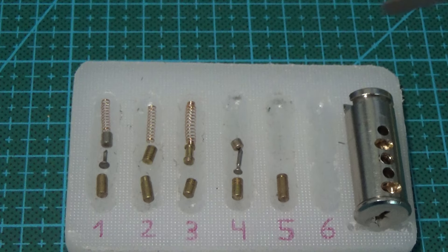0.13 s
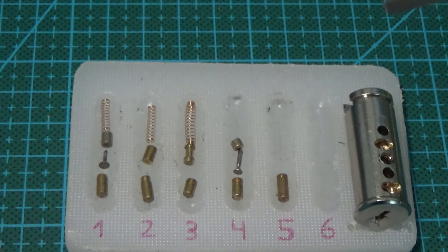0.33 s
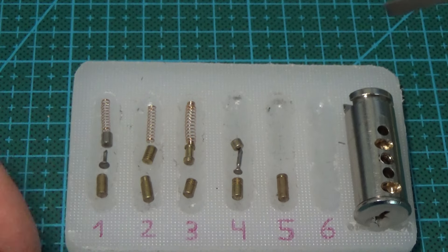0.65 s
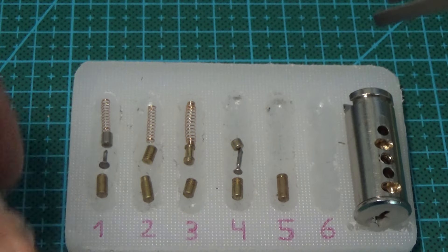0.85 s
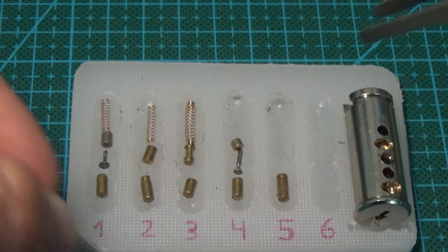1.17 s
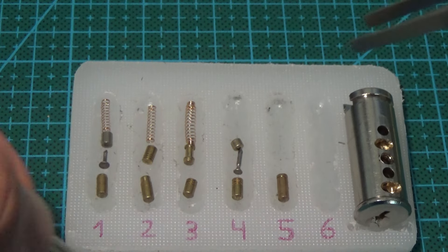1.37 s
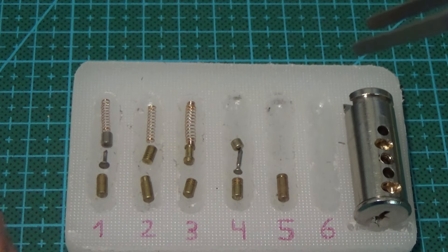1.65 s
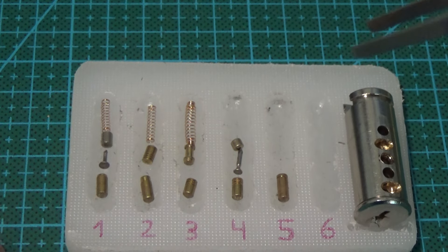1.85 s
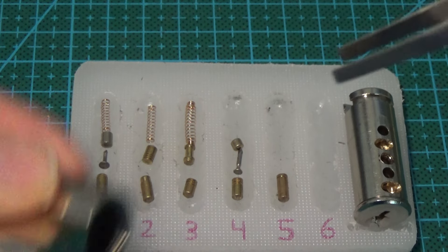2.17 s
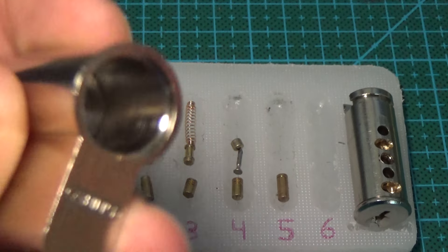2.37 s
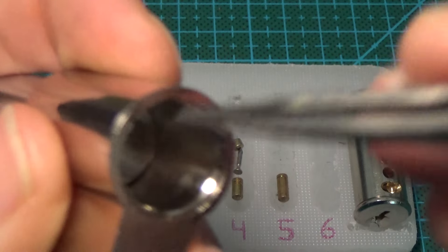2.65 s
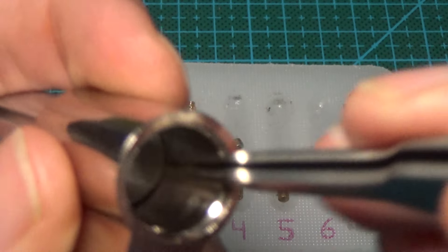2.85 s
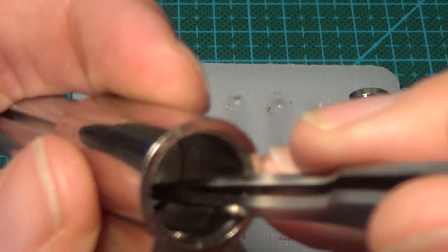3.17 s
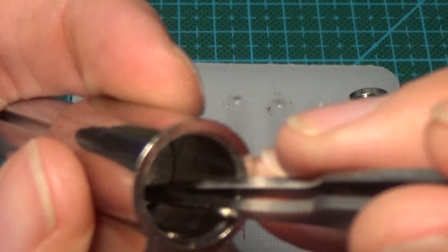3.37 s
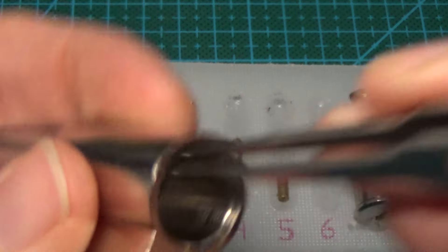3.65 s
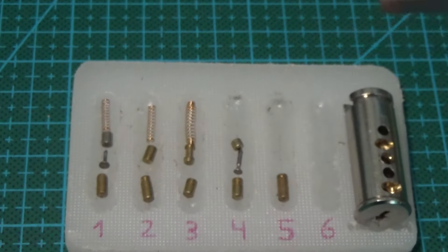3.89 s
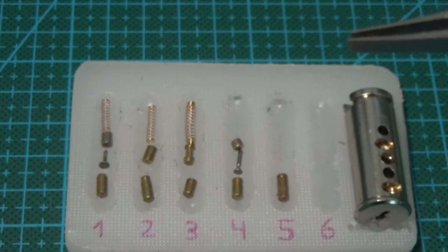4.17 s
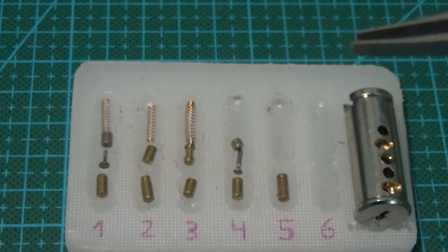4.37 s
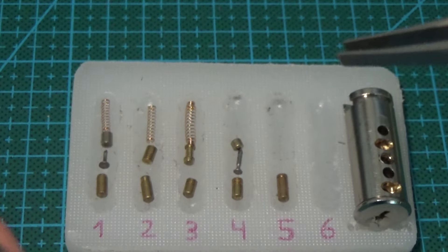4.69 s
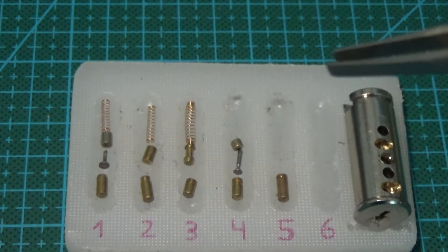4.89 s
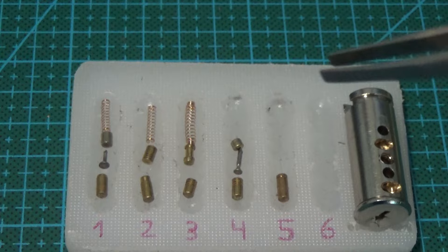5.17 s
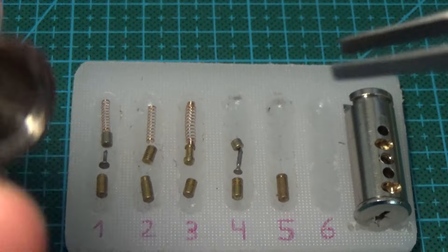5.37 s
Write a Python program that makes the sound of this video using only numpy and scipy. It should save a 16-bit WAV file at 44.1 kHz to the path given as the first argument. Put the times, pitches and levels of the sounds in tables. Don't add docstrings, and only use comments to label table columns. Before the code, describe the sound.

A metal lock housing is knocked on a bench mat, loose brass pins rattling; tweezers tick and scrape quietly, then harder knocks follow.

```python
import sys
import numpy as np
from scipy import signal
from scipy.fft import rfft, irfft, next_fast_len
from scipy.io import wavfile
from scipy.ndimage import map_coordinates

SR = 44100
rng = np.random.default_rng(int(sys.argv[2]) if len(sys.argv) > 2 else 0)


def makeup_ratio(level_db):
    decades = np.asarray(level_db, float) / 20
    return 10 ** decades


def bounce(signal):
    frames = np.transpose(np.atleast_2d(signal))
    limited = np.clip(frames, -1, 1)
    pcm = np.round(limited * 32767).astype(np.int16)
    wavfile.write(sys.argv[1], SR, pcm)


N = 244088

# (time [s], flat slap [dB], edge snap [dB],
# weight into the bench [dB], spread into mat and room [dB])
KNOCKS = [(.0896, -45, -17.5, -43, -32), (.0912, -5, -35, -21.5, -18), (.1660, -40.5, -55, -70, -49),
          (1.5878, -30, -22.5, -36.5, -34), (1.8124, -44, -13, -34.5, -38),
          (1.8161, -6.5, -45.5, -20.5, -20.5), (1.9527, -27, -23.5, -33.5, -30),
          (4.1464, -52, -11.5, -32, -34.5), (4.1481, -4, -34, -18.5, -20), (4.2029, -30.5, -40, -34, -39),
          (4.4740, -4.5, -14.5, -17.5, -13), (4.5280, -33, -32, -38.5, -30),
          (4.8171, -2.5, -41.5, -16.5, -12), (4.8235, -41, -44, -31, -26.5), (4.8734, -12, -50, -26.5, -17),
          (5.008, -55, -63.5, -43.5, -45)]
# (frequency [Hz], level [dB], t60 [s])
SLAP_MODES = [(1220, -11, .018), (1600, -3.5, .0075), (2120, -18, .02), (3000, -14, .004),
              (3750, -26, .015)]
# (frequency [Hz], level [dB], t60 [s])
BENCH_TOP_MODES = [(65.8, -14, 0.33), (94, -9, 0.2), (117.6, 0, 0.28), (149.7, -13, 0.28)]
# (frequency [Hz], level [dB], t60 [s])
BENCH_FRAME_MODES = [(190.2, -1.5, 0.18), (232.1, -1.5, 0.17), (276.9, -9, 0.3), (301.4, 5.5, 0.12),
                     (324, -16.5, 0.36), (468, -0.5, 0.0608), (527.4, -3, 0.085), (623.4, -10.5, 0.12),
                     (748, -2.5, 0.064)]
# (frequency [Hz], level [dB], t60 [s])
MAT_MODES = [(857, -15.5, 0.13), (1183, 4.5, 0.083), (1270, -4.5, 0.3), (1402, -0.5, .12), (1706, -24, .07),
             (1778, -11.5, 0.054), (1850, -5, 0.16), (2050, 0.5, 0.096), (2236, -3, 0.057),
             (2360, -22, 0.15), (2807, -3.5, 0.054)]
TOP_DB, FRAME_DB = -7.5, -9.5
MAT_DB, ROOM_DB = -24, -21.5

# (time [s], crack [dB], housing ring [dB])
STRIKES = [(.0895, -20.5, -49.5), (1.5906, -15, -52), (1.5920, -21.5, -48), (1.8116, -19, -46),
           (1.8160, -20.5, -56), (1.8195, -33, -59), (1.9526, -25, -53), (4.1460, -18.5, -44.5),
           (4.4805, -18, -43.5), (4.8171, -13, -41), (4.8237, -10, -20), (4.8259, -29, -29),
           (4.8347, -34, -26.5), (4.8775, -32.5, -35.5)]
# (frequency [Hz], level [dB], t60 [s])
HOUSING_MODES = [(4830, -9.5, 0.0402), (6280, -2.5, 0.034), (7940, -16, .1), (9250, 0, 0.033),
                 (9650, -1.5, 0.12), (10900, -4, 0.078), (12370, -14, .06), (12800, -17, .06),
                 (14400, -25, .06)]
# (frequency [Hz], level [dB])
CRACK_COLOUR = [(1500, -26), (3000, 12), (6500, 0.5), (11000, -4.5), (13000, -29), (15000, -27),
                (16200, -51)]

# (time [s], peak level [dB], voice [Hz])
PINS = [(.0902, -21.5, 3000), (.0935, -33, 4570), (.095, -25, 5680), (.1275, -40, 4600), (.191, -51, 5530),
        (.9205, -60, 3000), (1.5942, -25, 4880), (1.5985, -34, 6000), (1.8105, -29.5, 9380),
        (1.8160, -21, 5870), (1.8202, -21, 5980), (1.8250, -33, 5850), (1.9524, -38, 9600),
        (1.9536, -32, 4060), (1.9590, -38.5, 5030), (4.1460, -28, 8800), (4.1480, -40, 4640),
        (4.1725, -53, 10500), (4.1905, -55, 10500), (4.2110, -50, 5000), (4.4738, -31.5, 8100),
        (4.4801, -16.5, 4860), (4.4812, -27.5, 9200), (4.4920, -47, 10500), (4.5375, -44.5, 4000),
        (4.8169, -38, 9200), (4.8346, -27, 10900), (4.8775, -34, 3970), (5.2746, -47, 3510)]
PIN_T60_S, PIN_CRACK_DB = 0.0092, -4
# (frequency [Hz], level [dB], t60 [s])
GRAZE_MODES = [(350, -53.5, 0.046), (925, -44.5, .018), (1017, -47, 0.035), (2070, -49, 0.022)]
# (frequency [Hz], level [dB], t60 [s])
DROP_MODES = [(3300, -26, .0053), (5700, -21.5, 0.0061), (9430, -30, 0.018), (12300, -41, .011),
              (14700, -53, .032)]
# (frequency [Hz], level [dB], t60 [s])
CLASH_MODES = [(5170, -13, .0092), (6350, -15, .016), (9300, -12, 0.012), (11300, -25, .015),
               (13000, -31.5, .012)]
GRAZE_S, DROP_S, CLASH_S = .9022, 1.5908, 4.8243

# (time [s], level [dB])
CLOSING = [
    (2.3697, -26.5),
    (2.3702, -41),
    (5.2755, -44.5),
]
# (time [s], level [dB])
TOUCHING = [
    (2.8335, -23.5),
    (2.8345, -32),
    (2.8360, -32.5),
]
# (frequency [Hz], level [dB], t60 [s])
PRONG_MODES = [(2100, -16, 0.013), (3470, -10, 0.023), (4790, 0.5, 0.0076), (7600, -1.5, 0.013),
               (8930, -7, .015), (10060, -1, 0.008), (13000, 3, .012), (14800, -3.5, .008),
               (15800, 2, .008)]
# (frequency [Hz], level [dB], t60 [s])
RIM_MODES = [(1770, -24, 0.017), (2910, -5.5, 0.0093), (3460, -7.5, 0.018), (5380, -9, 0.017),
             (6250, -3, 0.023), (7360, -6, 0.012), (9100, 0, 0.011), (9800, 4, 0.013), (10760, 2.5, 0.013),
             (13200, -3.5, 0.015), (14800, -12, .015)]
# (start [s], hold [s], level [dB])
STROKES = [
    (2.932, 0.031, -56.5),
    (3.032, 0.024, -65),
]
STROKE_RISE_DB_PER_S, STROKE_FALL_DB_PER_S = 600, 810
# (frequency [Hz], width [Hz], level [dB])
BORE_MODES = [(2820, 160, 2), (3770, 230, -11), (6050, 160, -7), (7700, 30, 0), (9700, 47, -4),
              (11200, 47, -10), (13000, 36, -12), (13800, 34, -23), (14800, 55, -32)]

# (time [s], top level [dB], frame level [dB])
PUSHES = [(2.419, -72, -64), (2.474, -52, -68), (2.55, -67, -70), (2.59, -74, -74), (2.799, -75, -62),
          (2.807, -53.5, -61), (2.825, -72, -63)]
# (centre [s], level [dB], length [s])
DRAGS = [
    (2.2, -61.5, 0.056),
    (2.2, -74, 0.055),
    (2.84, -62.5, .035),
]
# (centre [s], level [dB], length [s])
RUSTLES = [(0.527, -63, 0.047), (0.778, -64.5, 0.0325), (0.893, -62.5, 0.018), (1.157, -63.5, 0.025),
           (1.238, -67, 0.028), (1.45, -67.5, 0.041), (2.018, -58.5, 0.0089), (2.223, -67, 0.0614),
           (2.528, -69, 0.18), (3.81, -73.5, 0.13), (5.35, -68, 0.1)]
# (frequency [Hz], level [dB])
SKIN_COLOUR = [(1500, -52), (3000, -4.5), (5500, -9), (7000, -5.5), (9300, -2), (11500, -11), (14500, -39),
               (16000, -51)]

# (time [s], step level [dB])
LENS_EFFORT = [(0, -54.5), (1.5, -57.5), (3, -58), (3.4, -52.5), (3.8, -52.5), (4.1, -53.5), (4.5, -53.5),
               (5, -52), (5.55, -57)]
# (frequency [Hz], level [dB], t60 [s])
MOTOR_MODES = [(2762, 0, 0.013), (3371, 2, 0.0085)]
LENS_RATE_HZ, BACK_DB = 25, -5.5

# (frequency [Hz], t60 [s])
ROOM_T60 = [(150, 1), (300, 0.84), (600, 0.23), (1300, 0.33), (3000, 0.27), (7000, 0.28), (14000, 0.21)]
# (frequency [Hz], level [dB])
KNOCK_ECHO = [(110, -22), (200, 3.5), (300, 3.5), (450, 1.5), (800, 4), (1300, 3), (2200, -2.5),
              (3500, -8.5), (7000, -25), (14500, -29.5), (16000, -52.5)]
# (frequency [Hz], likeness [0-1])
ROOM_ALIKE = [(150, 1), (500, 0.77), (1500, 0.71), (4000, 0.51), (10000, 0.89)]
# (frequency [Hz], density [dB per Hz])
HISS_COLOUR = [(12, -33.5), (20, -7), (131, -1.5), (313, -2.5), (769, -4.5), (1270, -5.5), (1840, -9),
               (2720, -10), (3810, -13.5), (14700, -20), (16400, -28)]
# (frequency [Hz], likeness [0-1])
HISS_ALIKE = [(60, 0.93), (130, 0.86), (290, 0.61), (640, -0.0), (1410, 0), (3100, 0.45), (6820, 0.76),
              (15000, 0.98)]


def unit(x):
    return x / np.sqrt(np.mean(x ** 2) + 1e-20)


def along(points, hz):
    f, v = np.transpose(points)
    return np.interp(np.log(hz + 1), np.log(f + 1), v)


def wobble(rate_hz):
    knots = rng.standard_normal(int(N * rate_hz / SR) + 4)
    return map_coordinates(knots, [np.arange(N) * rate_hz / SR])


def add(track, s, sound):
    part = track[..., max(round(s * SR), 0):][..., :sound.shape[-1]]
    part += sound[..., :part.shape[-1]]


def swells(events):
    t = np.arange(N) / SR
    return sum(makeup_ratio(db) * np.exp(-.5 * ((t - s) / length) ** 2) for s, db, length in events)


def noise(size, spectrum, alike):
    m = next_fast_len(size)
    hz = np.fft.rfftfreq(m, 1 / SR)
    turn = np.arccos(np.clip(along(alike, hz), -1, 1)) / 2
    shape = makeup_ratio(along(spectrum, hz)) * [np.cos(turn), np.sin(turn)]
    mid, side = irfft(rfft(rng.standard_normal((2, m))) * shape, m)[:, :size]
    return unit(np.array([mid + side, mid - side]))


def ring(modes, t, rise, scatter_db, turn=0):
    total = np.zeros(len(t))
    for hz, db, t60 in modes:
        level = makeup_ratio(db + rng.normal(0, 1) * scatter_db - 60 * t / t60)
        total += level * np.sin(2 * np.pi * (hz * t + turn))
    return total * (1 - np.exp(-t / rise))


def room(colour):
    hz, t, z = signal.stft(noise(SR // 2, colour, ROOM_ALIKE), SR, nperseg=128)
    late = makeup_ratio(-60 * t / along(ROOM_T60, hz)[:, None])
    early = makeup_ratio(23.0 - 60 * t / 0.017)
    tail = signal.istft(z * (late + early), SR, nperseg=128)[1][:, :SR // 2]
    return tail * (1 - np.exp(-np.arange(tail.shape[1]) / SR / 0.0031))


def knocks():
    out, t = np.zeros((2, N)), np.arange(SR // 2) / SR
    lead_s, swell_s, snap_s = .0004, .00026, .0001
    swell = np.sin(np.pi / 2 * np.clip(t / swell_s, 0, 1)) ** 2
    face = sum(makeup_ratio(db - 60 * t / t60) * np.cos(2 * np.pi * hz * (t - lead_s)) for hz, db, t60 in SLAP_MODES)
    slap = -swell * face
    u = t / snap_s
    snap = u ** 2 * (1.6 - u) * np.exp(-1.3 * u) * 3
    top = ring(BENCH_TOP_MODES, t, rise=.018, scatter_db=0, turn=.6)
    for s, slap_db, snap_db, weight_db, spread_db in KNOCKS:
        add(out, s - lead_s, makeup_ratio(slap_db - 1.5) * slap * makeup_ratio([[.6], [-.6]]))
        add(out, s - .0003, makeup_ratio(snap_db) * snap * makeup_ratio([[.8], [-.8]]))
        add(out, s, makeup_ratio(weight_db + TOP_DB) * top)
        frame = ring(BENCH_FRAME_MODES, t, rise=0.00037, scatter_db=2.5, turn=0.7)
        add(out, s - .0002, makeup_ratio(weight_db + FRAME_DB) * frame)
        mat = ring(MAT_MODES, t, rise=0.0011, scatter_db=0.5, turn=0.68)
        add(out, s, makeup_ratio(spread_db + MAT_DB) * mat)
        add(out, s, makeup_ratio(spread_db + ROOM_DB) * room(KNOCK_ECHO))
    return out


def crack(db, t):
    envelope = makeup_ratio(db - 4 - 60 * t / .006) * (1 - np.exp(-t / .0001))
    return envelope * noise(len(t), CRACK_COLOUR, [(3000, .96)])


def strikes():
    out, t = np.zeros((2, N)), np.arange(SR // 3) / SR
    colour = [(2500, -20.5)]
    for hz, db, _ in HOUSING_MODES:
        colour += [(hz * .985, db - 4.5), (hz, db - 1.5), (hz * 1.015, db - 8.5)]
    colour += [(15800, -43.5)]
    for s, crack_db, ring_db in STRIKES:
        steel = makeup_ratio(ring_db - 20.5) * ring(HOUSING_MODES, t, rise=0.00054, scatter_db=6)
        add(out, s - .0002, steel * makeup_ratio([[.6], [-.6]]) + crack(crack_db, t))
        chatter = makeup_ratio(ring_db - 13.5 + 2.4 * wobble(310)[:SR // 2])
        add(out, s, chatter * room(colour))
    return out


def clinks():
    out, t = np.zeros((2, N)), np.arange(SR // 3) / SR
    voices = []
    for s, modes in [(GRAZE_S, GRAZE_MODES), (DROP_S, DROP_MODES), (CLASH_S, CLASH_MODES)]:
        voices += [(s, db, hz, t60) for hz, db, t60 in modes]
    voices += [(s, db, hz, PIN_T60_S) for s, db, hz in PINS]
    for s, db, hz, t60 in voices:
        voice = makeup_ratio(db) * ring([(hz, 0, t60), (hz * 1.09, -6, t60)], t, rise=.0004, scatter_db=0)
        add(out, s - .0002, voice * makeup_ratio([[.6], [-.6]]))
        colour = [(hz / 2, -30), (hz * 0.8, -11), (hz, 0), (hz * 1.1, -14), (hz * 2, -35)]
        add(out, s, makeup_ratio(db - 43) * room(colour))
    for s, db, _ in PINS:
        add(out, s - .0002, crack(db + PIN_CRACK_DB, t))
    return out


def tips(ticks, modes):
    out, t = np.zeros((2, N)), np.arange(SR // 3) / SR
    colour = [(1200, -32)] + [(hz, db) for hz, db, _ in modes] + [(16500, -31.5)]
    for s, db in ticks:
        add(out, s - .0001, makeup_ratio(db - 11.5) * ring(modes, t, rise=.0001, scatter_db=3.5, turn=0.45))
        add(out, s, makeup_ratio(db - 38.0) * room(colour))
    return out


def slide():
    t = np.arange(N) / SR
    stroke = np.zeros(N)
    for s, hold, db in STROKES:
        rise_db = STROKE_RISE_DB_PER_S * np.maximum(s - t, 0)
        fall_db = STROKE_FALL_DB_PER_S * np.maximum(t - s - hold, 0)
        stroke += makeup_ratio(db - rise_db - fall_db)
    grains = rng.standard_normal(N) * makeup_ratio(4.0 * wobble(400))
    hz = np.fft.rfftfreq(N, 1 / SR)
    bore = sum(makeup_ratio(db) * 1j * hz * w / (c * c - hz * hz + 1j * hz * w) for c, w, db in BORE_MODES)
    bore = bore + makeup_ratio(-23) * (hz > 2400) * (hz < 6800)
    bore = bore + makeup_ratio(-19) * (hz > 1500) * (hz < 13500)
    return stroke * unit(irfft(rfft(grains) * bore, N))


def pushes():
    out, t = np.zeros(N), np.arange(SR // 2) / SR
    for s, top_db, frame_db in PUSHES:
        add(out, s, makeup_ratio(top_db) * ring(BENCH_TOP_MODES, t, rise=.003, scatter_db=2, turn=.5))
        add(out, s, makeup_ratio(frame_db) * ring(BENCH_FRAME_MODES[:5], t, rise=0.0077, scatter_db=5))
    return out


def drags():
    colour = [(40, -28), (110, -2), (230, 3.5), (450, -3), (900, -35)]
    return swells(DRAGS) * makeup_ratio(2.5 * wobble(28)) * noise(N, colour, [(200, .97)])


def rustles():
    return swells(RUSTLES) * makeup_ratio(1.3 * wobble(120)) * noise(N, SKIN_COLOUR, [(3000, 0.54), (10000, 0.84)])


def lens():
    out, t = np.zeros(N), np.arange(SR // 40) / SR
    effort_s, effort_db = np.transpose(LENS_EFFORT)
    for k in range(int(N / SR * LENS_RATE_HZ) + 1):
        at = k / LENS_RATE_HZ
        db = np.interp(at, effort_s, effort_db) + (0 if k % 2 else BACK_DB)
        late, twitch = rng.random(2)
        step = ring(MOTOR_MODES, t, rise=0.0013, scatter_db=3.0)
        add(out, at + 0.00052 * late - .0006, makeup_ratio(db + 5.5) * step)
        early = ring(MOTOR_MODES, t, rise=0.0015, scatter_db=5)
        add(out, at - .008, makeup_ratio(db - 50 * twitch + 3.5) * early)
    return out


def hiss():
    rumble_colour = [(18, -41.0), (30, -4.5), (44, -8), (70, -15), (100, -54.0)]
    rumble = makeup_ratio(-74 + 3.3 * wobble(4)) * noise(N, rumble_colour, [(40, 1.0)])
    return makeup_ratio(-62.5 + 0.13 * wobble(3.8)) * noise(N, HISS_COLOUR, HISS_ALIKE) + rumble


def scene():
    housing = knocks() + strikes() + clinks()
    tweezers = tips(CLOSING, PRONG_MODES) + tips(TOUCHING, RIM_MODES) + slide()
    hand = pushes() + drags() + rustles()
    return housing + tweezers + hand + lens() + hiss()


def low_pass(x):
    return signal.sosfilt(signal.butter(12, 17010, fs=SR, output="sos"), x)


def record(dry):
    low_cut = signal.butter(2, 45, "high", fs=SR, output="sos")
    high_cut = signal.cheby1(8, .5, 15800, fs=SR, output="sos")
    mix = signal.sosfilt(np.vstack([low_cut, high_cut]), dry)
    return low_pass(mix)


dry = scene()
out = record(dry)
bounce(out)
```